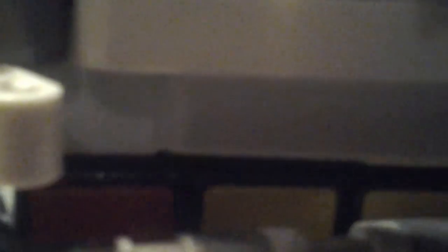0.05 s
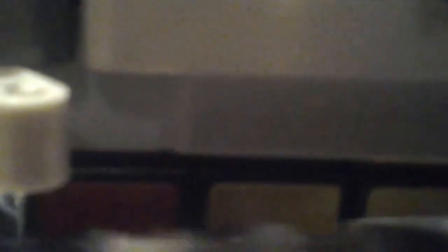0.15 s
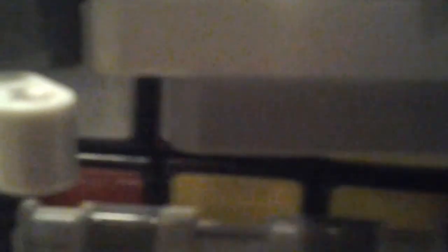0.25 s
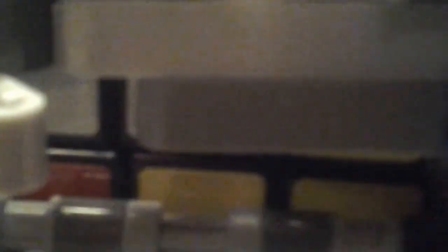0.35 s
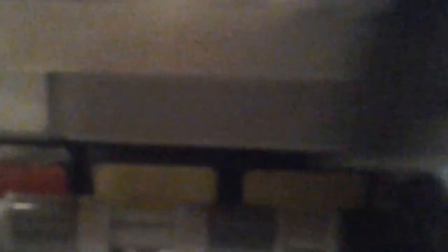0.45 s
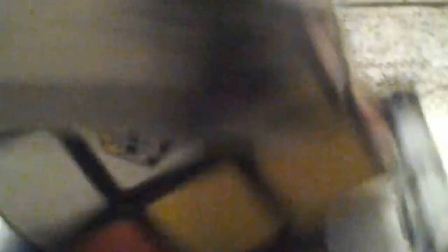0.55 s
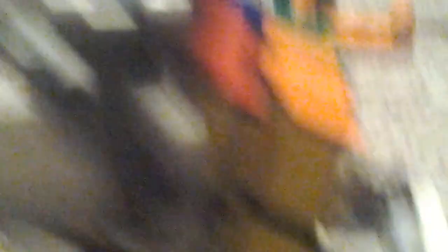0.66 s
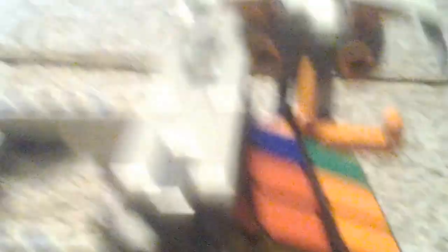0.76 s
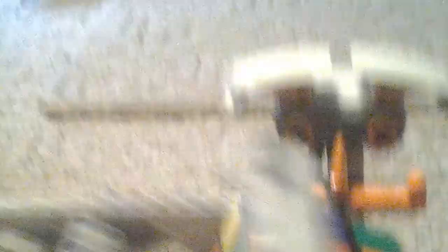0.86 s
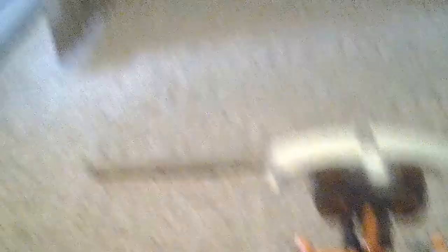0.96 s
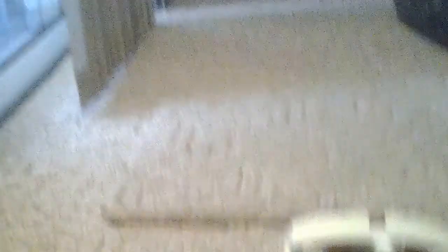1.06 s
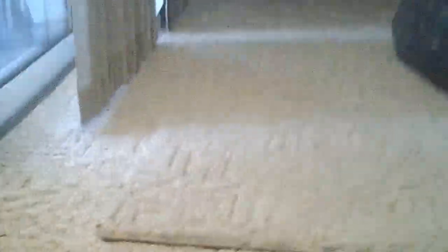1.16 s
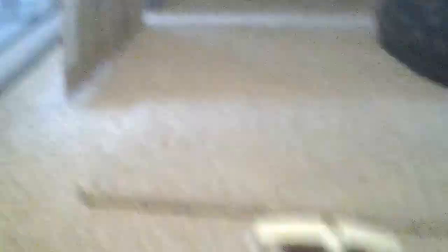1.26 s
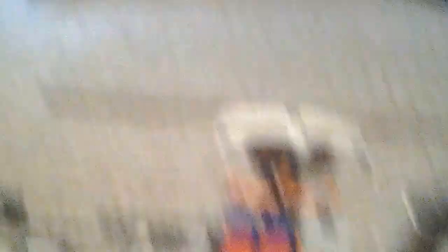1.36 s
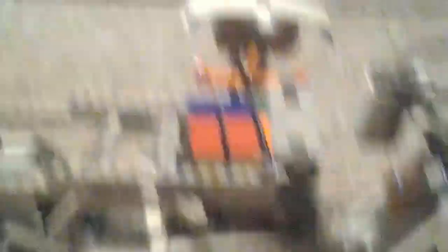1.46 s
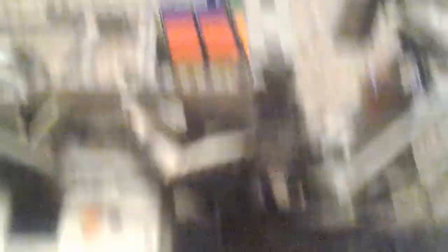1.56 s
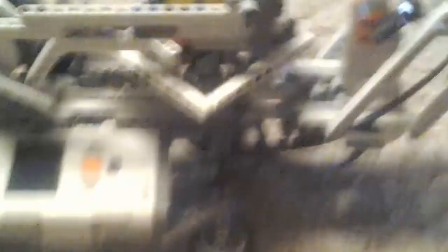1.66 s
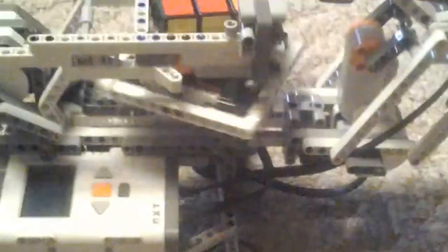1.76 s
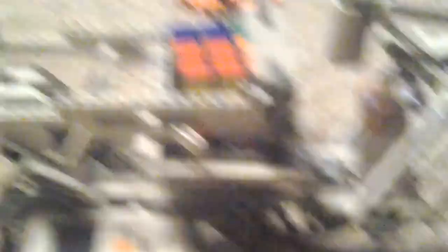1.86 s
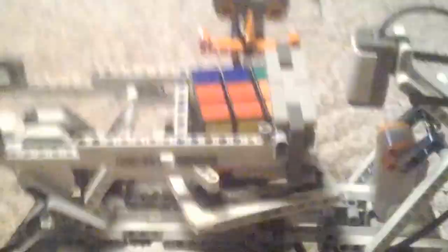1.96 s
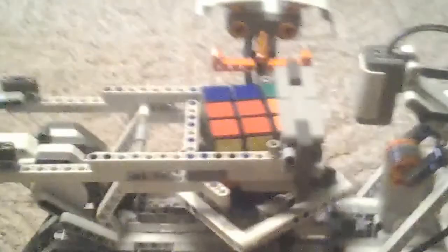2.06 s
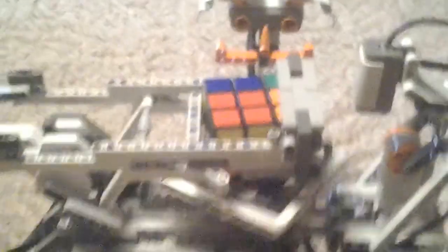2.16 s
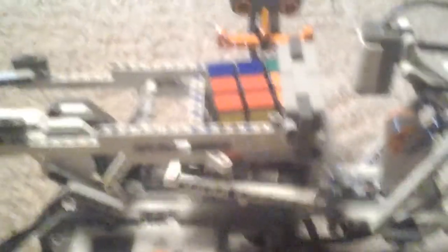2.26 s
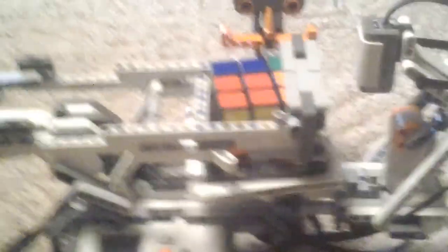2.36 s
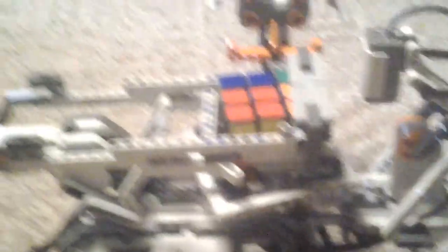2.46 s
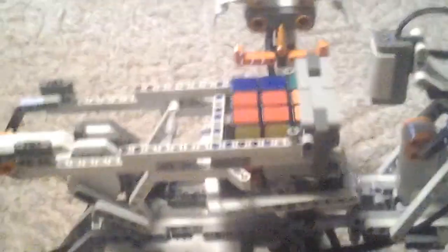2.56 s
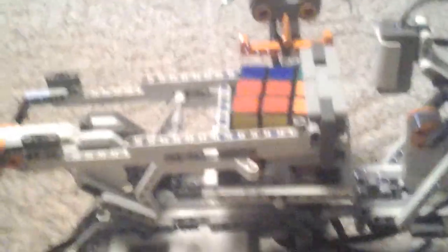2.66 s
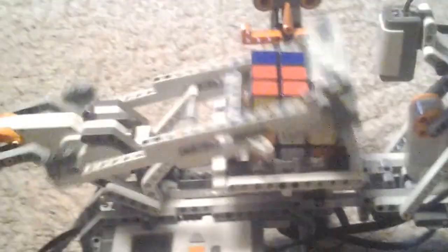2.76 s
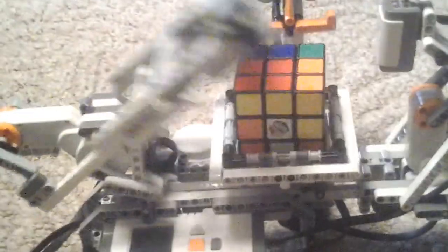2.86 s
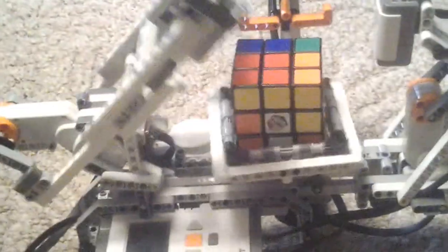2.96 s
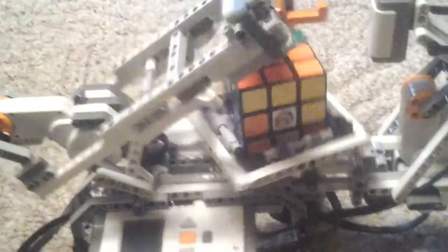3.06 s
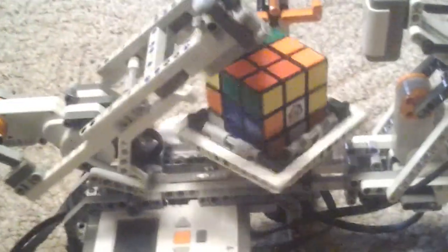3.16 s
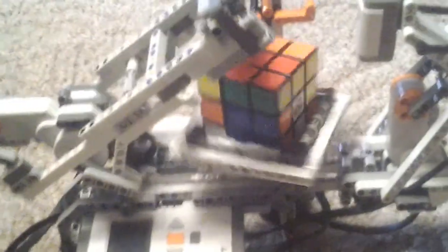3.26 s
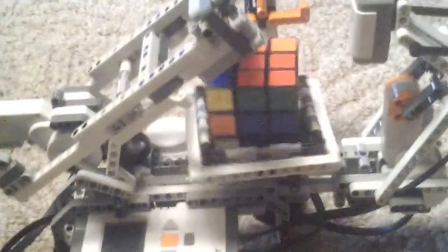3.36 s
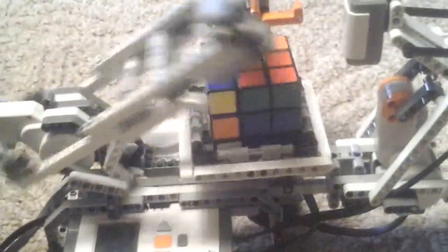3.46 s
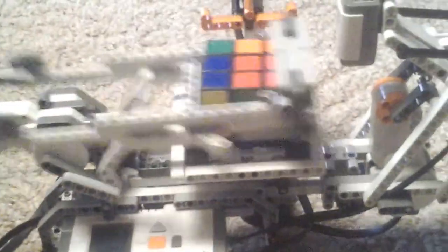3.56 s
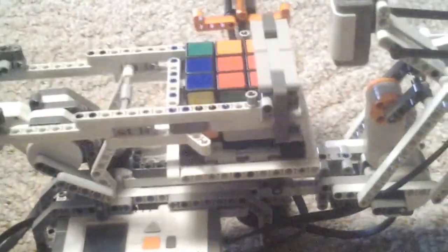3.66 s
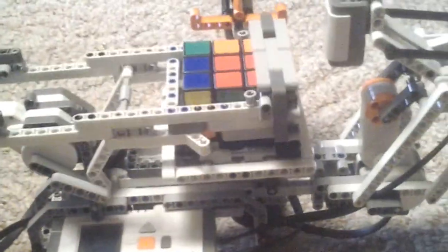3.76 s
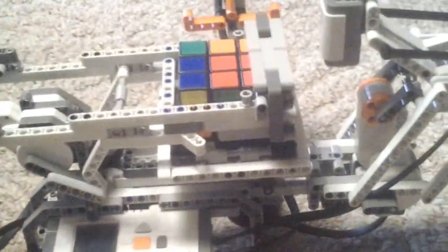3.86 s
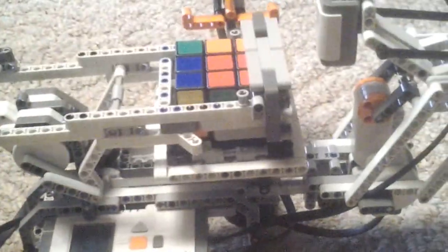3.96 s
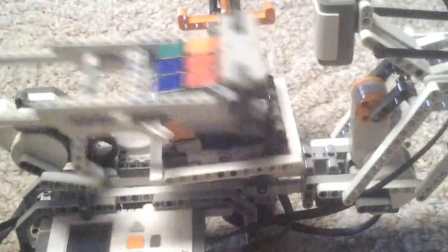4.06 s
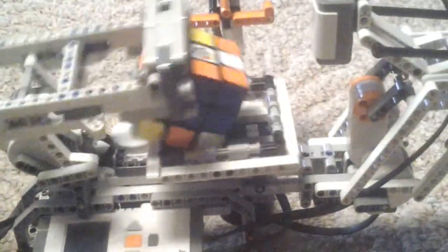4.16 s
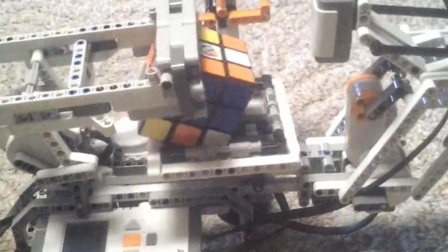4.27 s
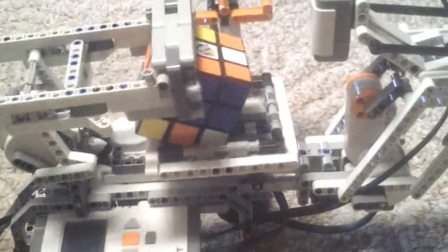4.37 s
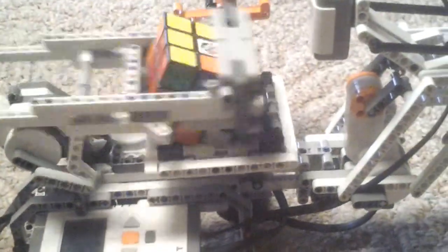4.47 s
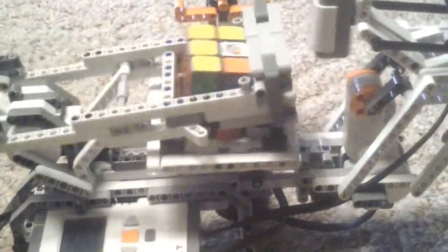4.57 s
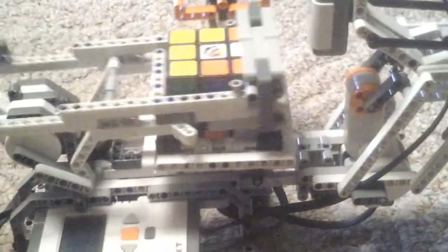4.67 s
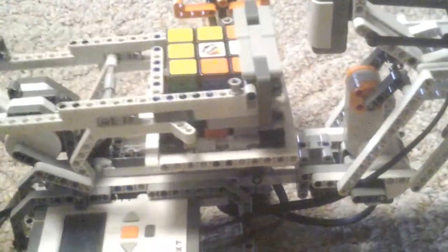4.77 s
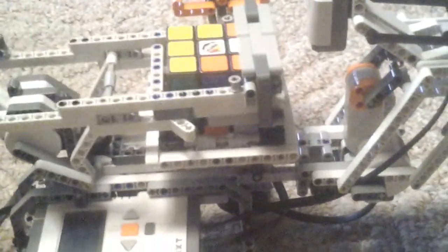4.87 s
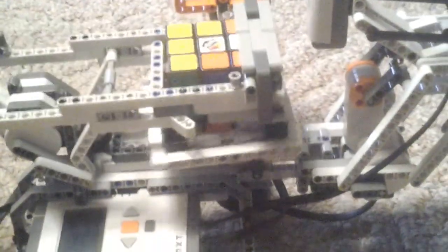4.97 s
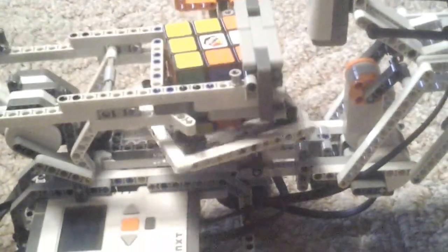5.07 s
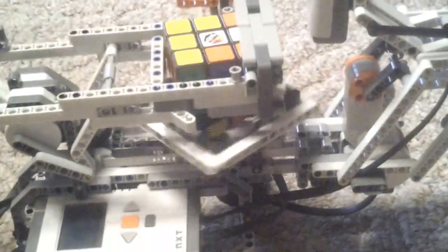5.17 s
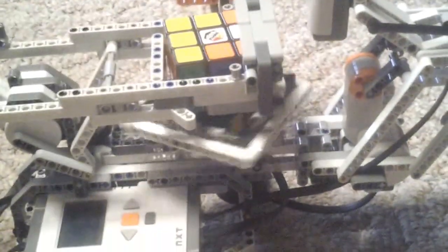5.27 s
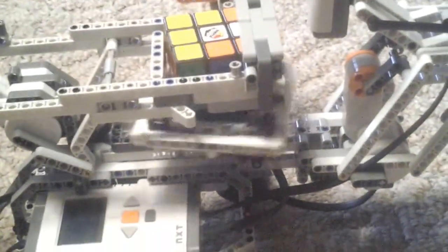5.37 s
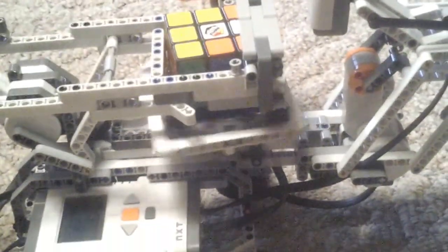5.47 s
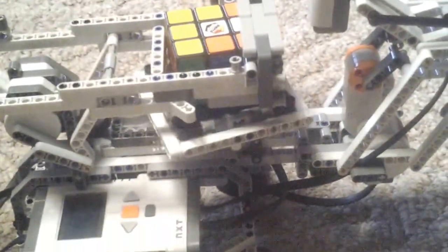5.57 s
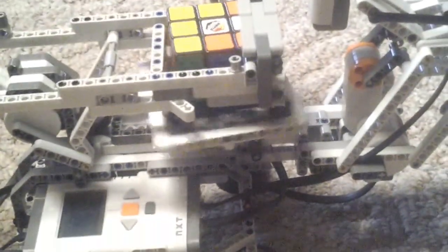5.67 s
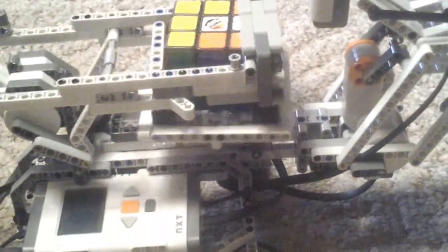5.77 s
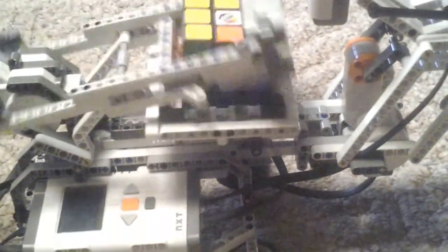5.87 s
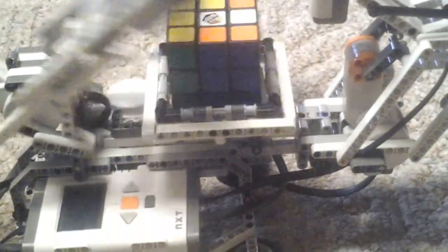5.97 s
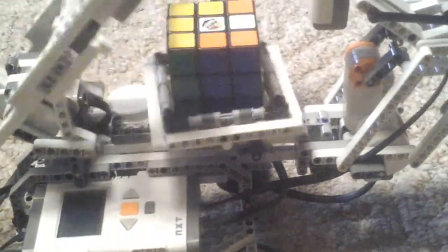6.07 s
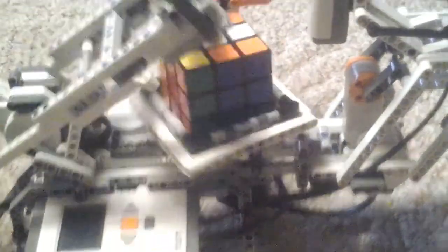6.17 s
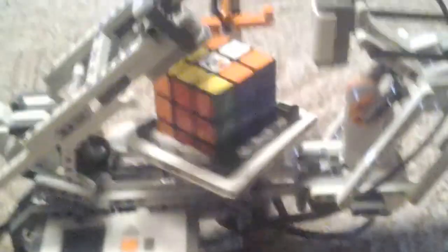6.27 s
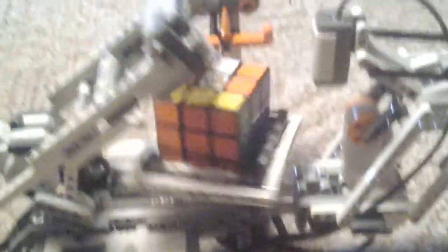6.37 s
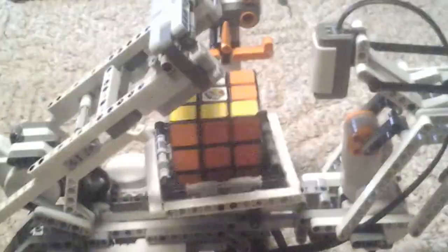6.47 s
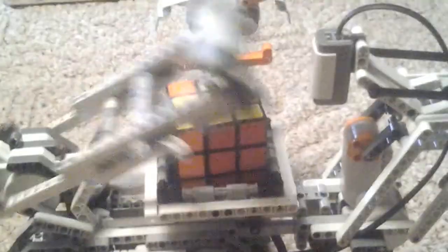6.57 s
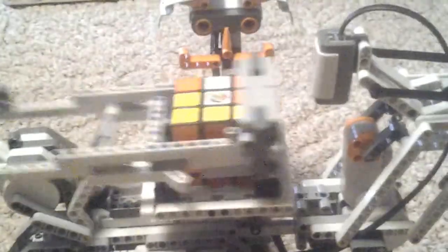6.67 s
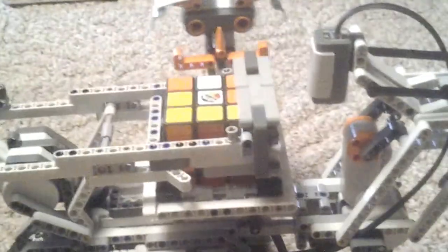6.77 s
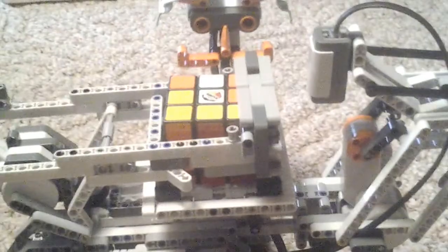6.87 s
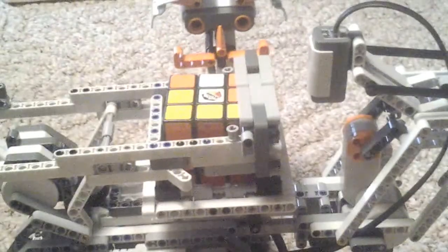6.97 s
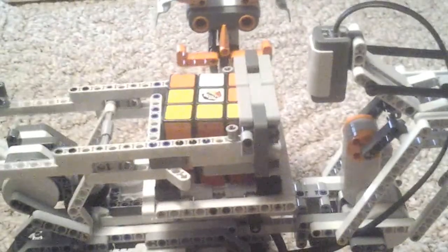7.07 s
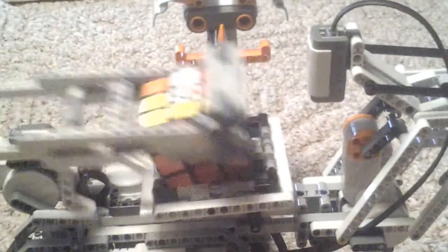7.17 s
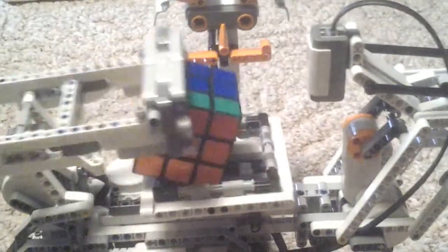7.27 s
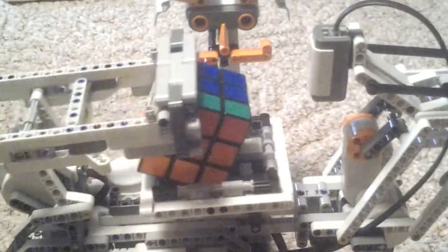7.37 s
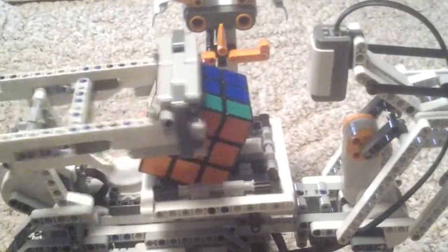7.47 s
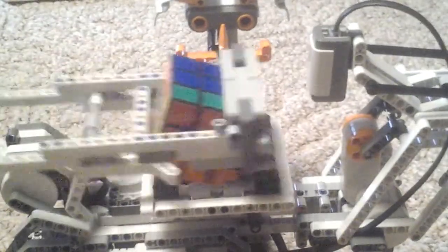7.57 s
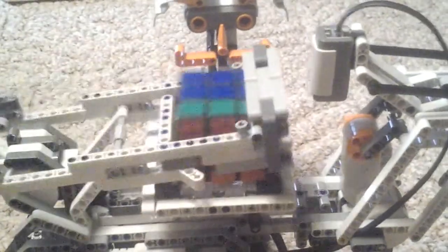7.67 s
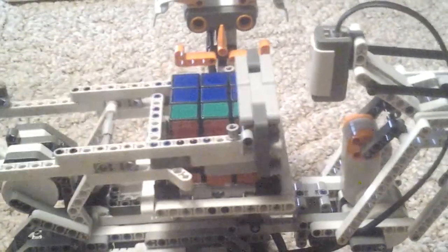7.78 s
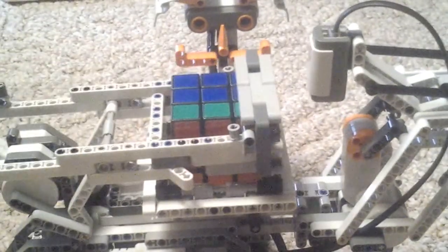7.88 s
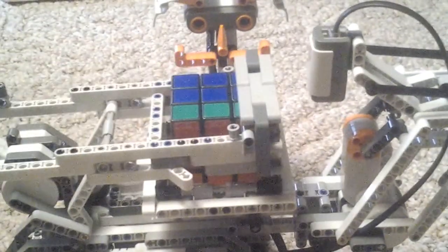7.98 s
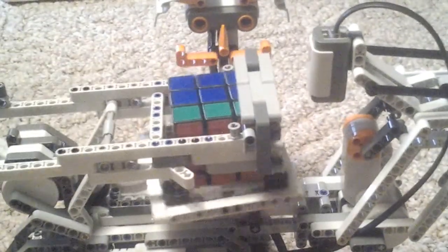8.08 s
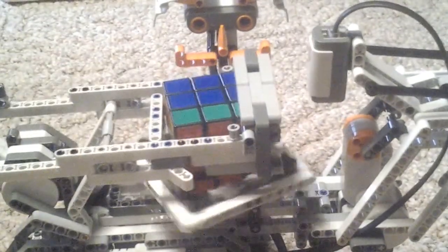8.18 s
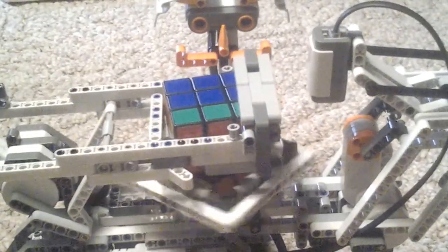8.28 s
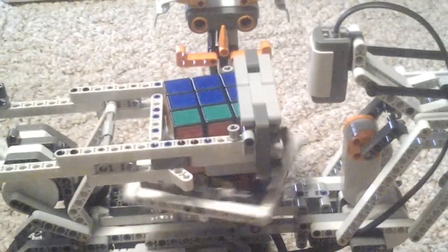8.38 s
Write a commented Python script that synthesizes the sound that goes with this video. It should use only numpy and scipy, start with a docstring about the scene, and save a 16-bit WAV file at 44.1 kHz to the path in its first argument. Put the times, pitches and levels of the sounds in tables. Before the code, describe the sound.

Very close, loud plastic whirs and clacks, then the same small robot slightly farther off, buzzing, pausing and knocking a cube into its tray.

```python
"""In a small carpeted room, a toy robot of plastic beams turns a puzzle cube, heard very close at first.
One geared motor swings an arm that clamps and tips the cube; another spins the tray or twists a layer.
Tooth pulses make the gears whine, and random ticks and rubbing noise make them rattle through the frame.
Short noise bursts make the clacks of the cube, the clicks of pins and soft bumps on the hand-held camera.
A steady hush lies underneath, and both channels are the same."""
import sys
import numpy as np
from scipy import signal
from scipy.fft import rfft, irfft
from scipy.io import wavfile

SR = 44100
rng = np.random.default_rng(int(sys.argv[2]) if len(sys.argv) > 2 else 0)


def output_pcm(signal):
    """Save a mono or channel-first signal as 16-bit PCM at the path in sys.argv[1].

    Samples are clipped to [-1, 1] before scaling.
    """
    pcm = np.clip(np.atleast_2d(signal).T, -1, 1) * 32767
    wavfile.write(sys.argv[1], SR, np.round(pcm).astype(np.int16))


N = 371310
TIME = np.arange(N) / SR

# All levels in the tables are relative: the frame, filters and mix still change them.
# "Balance" sets the low resonance of the frame against the high one; motors() shifts and scales it.

# The tray twists a layer of the cube, one list of rows for each twist.
# Each row: time in seconds, tooth rate in Hz, with some of its wobble; the surge adds more.
TWIST_SPEEDS = [
    [(-0.03, 857.3), (0.04, 818.6)],
    [(1.49, 771.7), (1.856, 793), (1.868, 823.7), (1.95, 839.8), (2.184, 763), (2.318, 848.6),
     (2.38, 837.6), (2.396, 799.5), (2.42, 889)],
    [(5.018, 744), (5.08, 802.4), (5.28, 738.7), (5.418, 773.6), (5.442, 744), (5.464, 777), (5.52, 727)],
    [(8.13, 819), (8.28, 841.5), (8.42, 846.6)],
]
# The load of each twist, whose slow gear catches once a turn.
# Each row: first catch in seconds, level in dB, balance in dB, size of the surge in dB.
TWIST_LOADS = [(0.023, -16.5, -10.5, 2), (1.525, -19, -4, 1.7), (5.061, -18, -4, 2), (8.146, -17.5, -5, 0)]
# How clearly each twist whines over its rattle. Each entry: whine in dB.
TWIST_WHINE_DB = [2, -1, 3, -3]
# The tray motor takes up slack, backs off or spins the unclamped cube, and only rattles.
# Each row: start in seconds, length in seconds, level in dB, balance in dB.
TRAY_RUNS = [(0.084, 0.14, -22, -2.5), (1.374, 0.065, -24.5, -10), (1.425, 0.057, -18.5, -18),
             (2.455, 0.16, -31, 4.5), (2.903, 0.33, -23.5, -3), (3.212, 0.12, -20, -3.5),
             (4.909, 0.33, -23, -4.5), (5.579, 0.14, -28.5, 1), (6.001, 0.43, -23, -4),
             (7.994, 0.15, -24, -5.5)]
# Short rattles of the arm: slow runs under load, and bursts as it rebounds.
# Each row: start in seconds, length in seconds, level in dB, balance in dB.
ARM_RATTLES = [(0.27, .15, -46, -2), (0.645, 0.056, -27.5, 1.5), (0.94, 0.026, -6.5, -12),
               (1.0, 0.024, -10.5, -8), (1.06, 0.057, -17.5, -12.5), (1.17, 0.054, -26.5, -6),
               (1.27, 0.13, -35.5, -14), (4.56, 0.11, -26, -6.5), (7.56, .2, -23, -8)]
# The arm motor spins up, whines while it runs free, then brakes and its rattle fades.
# Each row: start in seconds, seconds from start to end of whine, seconds from start to end of drive,
# top tooth rate in Hz, level in dB, balance in dB, whine over rattle in dB, fade in dB per second.
ARM_STROKES = [(0.42, .172, 0.15, 728, -7.5, -15, 14, 270.5), (0.803, .1, 0.083, 702, -5, -19, 0, 377),
               (2.657, .173, .17, 772.6, -15.5, -6.5, 5.5, 283),
               (3.39, 0.1, 0.16, 713.5, -17.5, -5, 7, 154), (3.977, 0.15, 0.14, 727.7, -17, -5, 5, 141),
               (4.335, 0.08, 0.18, 703, -17.5, -11.5, 15, 253),
               (5.772, .168, .16, 774, -15.5, -9.5, 9.5, 259.5),
               (6.482, 0.099, 0.16, 723, -17, -6, 13.5, 157.5),
               (7.062, 0.16, 0.16, 739, -19.5, -8, 3.5, 160),
               (7.438, 0.096, 0.09, 745, -15.5, -14, 16.5, 152)]
# What the tooth impacts of each motor put into the frame. Each row: frequency in Hz, level in dB.
TRAY_TEETH = [(750, -3.5), (1550, 5.5), (2300, -0.5), (3050, -2.5), (3800, 2), (5300, 3.5), (6100, 0.5),
              (10000, 1.5)]
ARM_TEETH = [(600, -30), (1400, 0), (2100, 2.5), (2900, -3.5), (3600, 0), (4600, 2.5), (6000, -1),
             (10000, 1.5)]
# How the frame radiates from close up, from the tray and from the arm.
# Each row: frequency in Hz, level in dB.
CLOSE_FRAME = [(250, -59), (600, -33.5), (1000, -19.5), (1700, -17.5), (2800, -5.5), (3400, -5.5),
               (4400, 0.5), (5000, -7), (5800, -13), (6700, -12.5), (8000, -19), (11000, -24.5),
               (14000, -50.5)]
TRAY_FRAME = [(400, -53), (820, -20), (1050, -23.5), (1750, -16), (2080, 0), (2480, 1), (2950, -17),
              (3800, -4.5), (4500, -2), (5300, -4.5), (5900, -17), (6600, -8.5), (7500, -18.5),
              (10200, -25), (12500, -69.5)]
ARM_FRAME = [(250, -47), (700, -34.5), (1200, -21.5), (1800, -16), (2300, -2), (3100, -18), (3900, -16),
             (4500, 2.5), (5000, -12), (5800, -14.5), (6600, -11), (7600, -23.5), (10500, -24.5),
             (13000, -54.5)]
# Gears and pins snap across their play. Each row: time in seconds, strength in dB.
PIN_CLICKS = [(0.3295, -23.5), (0.3721, -18), (0.409, -26), (0.609, -8.5), (0.806, -16.5), (0.8411, -9),
              (0.9216, 1), (1.0215, -5.5), (1.0938, -8), (1.2803, -16.5), (3.6921, -31), (3.739, -27),
              (3.8175, -28), (4.259, -16.5), (4.4114, -17), (5.7939, -16), (5.8326, -11), (6.7775, -16.5),
              (7.5029, -4), (7.6125, -6), (7.9958, -32), (8.1427, -5)]
# The hollow cube drops into its tray or is struck by the arm.
# Each row: time in seconds, strength in dB, strength of the hollow body in dB.
CUBE_KNOCKS = [(0.6027, -19, -37), (0.648, 2, -18.5), (0.6905, -18, -34), (0.7373, -15.5, -28.5),
               (0.7607, -18, -33), (0.957, -7, -24.5), (1.6625, -12, -22), (2.7278, -19, -29),
               (3.5269, -5, -21), (3.5573, 5, -16.5), (4.1837, -17, -26), (4.4472, -1, -24),
               (4.4684, -1.5, -21.5), (4.5513, -0.5, -19), (6.6133, -4, -22), (6.6462, 2.5, -25),
               (7.2866, -8, -30.5), (7.327, -15, -30.5), (7.542, -6, -25), (7.574, -1.5, -19),
               (7.651, -8.5, -29), (7.6952, -11, -27)]
# What a knock rings with, and the hollow cube under it. Each row: frequency in Hz, level in dB.
CLACK_RING = [(700, -28.5), (1500, -20), (2300, 4), (3100, -5), (4500, 8), (5600, 2.5), (6600, -9),
              (8500, -12.5), (14000, -41.5)]
CUBE_BODY = [(60, -34), (150, -32.5), (350, 7), (700, -5), (1100, 15), (1600, 18), (3000, -25.5)]
# Soft bumps on the camera. Each row: time in seconds, strength in dB.
BUMPS = [(1.082, -30), (1.186, -38), (1.235, -29), (1.271, -34.5), (1.733, -25), (1.97, -35.5)]
# The dull tone of a bump. Each row: frequency in Hz, level in dB.
BUMP_BODY = [(50, -17), (150, 4.5), (300, 17.5), (550, 14.5), (1200, 9), (3000, -22)]
# The tone of the quiet room. Each row: frequency in Hz, level in dB per Hz.
ROOM_HUSH = [(50, -23), (150, -15.5), (300, -6.5), (520, -2), (900, -14), (2000, -16), (4500, -24),
             (14000, -29.5)]

HUSH_DB = -55  # before the microphone's filters
CLOSE_UNTIL_S = 1.33  # middle of the fade from close up to farther away
TOP_HZ = 15300  # edge of the treble cut
# time constants in seconds with which a stroke, a run that only rattles and a twist come up
SPIN_UP_S, RATTLE_RISE_S, TWIST_RISE_S = 0.035, 0.018, 0.0036
STOP_DB_PER_S = 300.5  # how fast a run that only rattles or a twist dies away
WHINE_AFTER_S = 0.043  # an arm stroke starts to whine this long after its start
BREAKAWAY_DB, EASE_S = 5, 0.27  # a layer is stiffest as it breaks away, then eases


def undb(db):
    """Turn decibels into gain."""
    return 10 ** (np.asarray(db) / 20)


def unit(x):
    """Scale to an average strength (rms) of 1."""
    return x / np.sqrt(np.mean(x ** 2))


def colour(x, points):
    """Give x the tone drawn by (Hz, dB) points, without pre-echo; white noise keeps its power."""
    hz, db = np.transpose(points)
    size = 2048
    bin_hz = np.fft.rfftfreq(size, 1 / SR)
    log_gain = np.log(undb(np.interp(np.log(bin_hz + 1), np.log(hz), db)))
    # folding the cepstrum forward makes the filter respond only after its input
    cepstrum = irfft(log_gain)[:size // 2]
    cepstrum[1:] *= 2
    response = irfft(np.exp(rfft(cepstrum, size)))
    return signal.oaconvolve(x, response / np.linalg.norm(response))[:len(x)]


def hush():
    """The quiet room: steady noise with the room's tone."""
    return undb(HUSH_DB) * colour(rng.standard_normal(N), ROOM_HUSH)


def walk(rate):
    """Wander smoothly at random, with about rate turns a second and spread 1."""
    steps = rng.standard_normal(N // 8)
    return unit(np.interp(TIME * rate, np.arange(len(steps)), steps))


def gate(spans, fade_s):
    """1 inside the (from, to) spans, sloping to 0 across their edges."""
    return sum(np.clip(0.5 + np.minimum(TIME - a, b - TIME) / fade_s, 0, 1) for a, b in spans)


def running(spans, gains_db, fade_s):
    """The gain of each run while it lasts, 0 between runs."""
    return sum(undb(db) * gate([span], fade_s) for span, db in zip(spans, gains_db))


def effort(start_s, length_s, rise_s, fade_db_per_s):
    """Gain of one run: it grows with the square of the motor's speed and fades once the drive is cut."""
    age = np.maximum(TIME - start_s, 0)
    speed = 1 - np.exp(-age / rise_s)
    fade_db = -abs(fade_db_per_s) * np.maximum(age - length_s, 0)
    return speed ** 2 * undb(fade_db)


def twist_spans():
    """From when to when each twist lasts."""
    return [(run[0][0], run[-1][0]) for run in TWIST_SPEEDS]


def twist_speed():
    """Tooth rate of the tray motor in Hz, joined by straight lines."""
    return np.interp(TIME, *np.concatenate(TWIST_SPEEDS).T)


def surge():
    """Every forty teeth the loaded tray jerks free and then slows: a rounded sawtooth."""
    turns = np.cumsum(twist_speed()) / SR / 40
    wave, depth_db = np.zeros((2, N))
    for span, (catch_s, _, _, surge_db) in zip(twist_spans(), TWIST_LOADS):
        angle = 2 * np.pi * (turns - np.interp(catch_s, TIME, turns)) + np.pi / 3
        jerk = gate([span], fade_s=0.04) * (np.sin(angle) + 0.35 * np.sin(2 * angle))
        wave = wave + jerk
        depth_db = depth_db + surge_db * jerk
    return wave, depth_db


def arm_speed():
    """Tooth rate of the arm motor in Hz: at every stroke it starts from 0 and nears its top speed."""
    hz = np.full(N, 500.0)
    for start, _, _, top_hz, *_ in ARM_STROKES:
        on = TIME > start
        hz[on] = top_hz * (1 - np.exp((start - TIME[on]) / SPIN_UP_S))
    return hz


def stutter(rate, decay_s, depth_db):
    """The long, loose arm judders: at random moments its gears snatch, and the jolt dies away. In dB."""
    snatches = (rng.random(N) < rate / SR) * rng.random(N)
    jolts = np.tanh(signal.oaconvolve(snatches, np.exp(-TIME[:SR // 10] / decay_s))[:N])
    return depth_db * (jolts - jolts.mean())


def mesh(hz, wander, scatter_db, shaft_db, stage_db):
    """A pulse for each tooth; the ten-tooth pinion and the next gear stage make the pulses uneven."""
    hz = hz * (1 + wander * walk(250))
    teeth = np.cumsum(hz) / SR
    at = np.flatnonzero(np.diff(np.floor(teeth)))[:-1]
    late = (np.ceil(teeth[at]) - teeth[at]) * SR / hz[at]
    turn = 2 * np.pi * teeth[at]
    next_stage = turn * 9 / 40  # nine beats for every forty teeth
    size_db = scatter_db * rng.standard_normal(N)[at]
    size_db = size_db + shaft_db * np.sin(turn / 10) + stage_db * np.sin(next_stage)
    size = undb(size_db)
    # share each pulse between two samples, so that it can fall between them
    pulses = np.zeros(N)
    pulses[at], pulses[at + 1] = size * (1 - late), size * late
    # slow pushes do not radiate from so small a frame
    return unit(signal.sosfilt(signal.butter(2, 650, "high", fs=SR, output="sos"), pulses))


def disperse(x, delay_s):
    """Bending waves run faster in the treble, so a pulse spreads along a beam; the delay is for 3 kHz."""
    hz = np.fft.rfftfreq(N, 1 / SR)
    return irfft(rfft(x) * np.exp(-4j * np.pi * delay_s * np.sqrt(3000 * hz)), N)


def ring(x, t60_s, wet_db):
    """Add a dense, decaying tail: the many modes of the beams, or the room."""
    t = TIME[:SR // 2]
    tail = rng.standard_normal(len(t)) * undb(-60 * t / t60_s)
    return x + undb(wet_db) * signal.oaconvolve(x, tail / np.linalg.norm(tail))[:N]


def rattle(rate, spread_db, ring_s, rub):
    """Loose gears and pins chatter: dense, uneven ticks, each briefly ringing, over rubbing plastic."""
    tick_size = undb(spread_db * np.clip(rng.standard_normal(N), -2, 2))
    ticks = (rng.random(N) < rate / SR) * rng.choice([-1, 1], N) * tick_size
    t = TIME[:SR // 20]
    energy = signal.oaconvolve(ticks ** 2, undb(-120 * t / ring_s))[:N]
    ringing = np.sqrt(np.abs(energy)) * rng.standard_normal(N)
    return unit(0.38 * unit(ticks) + unit(ringing) + rub * rng.standard_normal(N))


def gears():
    """Arm strokes and twists whine over their rattle; all other runs only rattle."""
    jerk, surge_db = surge()
    tray_hz = twist_speed() * (1 + 0.017 * jerk)
    tray = mesh(tray_hz, wander=0.012, scatter_db=3, shaft_db=3, stage_db=2.5)
    arm = mesh(arm_speed(), wander=0.006, scatter_db=2, shaft_db=1.8, stage_db=3)
    # gliding partials swell and fade as they cross the narrow modes of the beams
    tray = unit(ring(disperse(colour(tray, TRAY_TEETH), delay_s=0.005), t60_s=0.03, wet_db=-6))
    arm = unit(ring(disperse(colour(arm, ARM_TEETH), delay_s=0.006), t60_s=0.035, wet_db=-1))
    free = [(start + WHINE_AFTER_S, start + free_s) for start, free_s, *_ in ARM_STROKES]
    tray_whine = running(twist_spans(), TWIST_WHINE_DB, fade_s=0.054)
    arm_whine = running(free, [whine_db for *_, whine_db, _ in ARM_STROKES], fade_s=0.0073)
    chatter = rattle(rate=650, spread_db=5.0, ring_s=0.052, rub=0.43)
    force = chatter + arm_whine * arm + tray_whine * tray
    # keep the power level as the whine comes and goes
    force = force / np.sqrt(1 + arm_whine ** 2 + tray_whine ** 2)
    return force * undb(surge_db)


def rattling_runs(runs):
    """Gain and balance of each run that only rattles."""
    return [(undb(db) * effort(start, length, RATTLE_RISE_S, STOP_DB_PER_S), balance_db)
            for start, length, db, balance_db in runs]


def drive():
    """All runs together: their gain, their balance in dB, and the tray motor's share of the power."""
    tray = rattling_runs(TRAY_RUNS)
    for (start, end), (_, db, balance_db, _) in zip(twist_spans(), TWIST_LOADS):
        stiff_db = BREAKAWAY_DB * np.exp(-np.maximum(TIME - start, 0) / EASE_S)
        gain = undb(db + stiff_db) * effort(start, end - start, TWIST_RISE_S, STOP_DB_PER_S)
        tray.append((gain, balance_db))
    arm = rattling_runs(ARM_RATTLES)
    for start, _, driven, _, db, balance_db, _, fade in ARM_STROKES:
        arm.append((undb(db) * effort(start, driven, SPIN_UP_S, fade), balance_db))
    runs = arm + tray
    power = sum(gain ** 2 for gain, _ in runs) + 1e-18
    balance = sum(gain ** 2 * balance_db for gain, balance_db in runs) / power
    on_tray = sum(gain ** 2 for gain, _ in tray) / power
    return np.sqrt(power), balance, on_tray


def resonance(x, low_hz, high_hz):
    """The part of x that one broad resonance of the frame carries."""
    return signal.sosfiltfilt(signal.butter(1, [low_hz, high_hz], "band", fs=SR, output="sos"), x)


def motors(close_db, arm_db, tray_db):
    """The gear forces shake the frame, which sounds different from each motor and from close up."""
    gain, balance_db, on_tray = drive()
    judder_db = (1 - on_tray) * stutter(rate=47, decay_s=0.0079, depth_db=9.5)
    force = gears() * gain * undb(judder_db)
    close = gate([(-1, CLOSE_UNTIL_S)], fade_s=0.27)
    # the load shifts weight between the low and high resonance, around a balance set by where one listens
    lean_db = balance_db + 3.5 + 6 * close
    force = force + (undb(0.73 * lean_db) - 1) * resonance(force, 1800, 2900)
    force = force + (undb(-0.25 * lean_db) - 1) * resonance(force, 4400, 5640)
    arm = undb(arm_db) * colour(force * (1 - on_tray), ARM_FRAME)
    tray = undb(tray_db) * colour(force * on_tray, TRAY_FRAME)
    near = undb(close_db) * colour(force, CLOSE_FRAME)
    return close * near + (1 - close) * (arm + tray)


def clacks(crack_s, tail_db, tail_s, ring_db, body_db):
    """Each knock is a sharp crack and a short clatter; knocks of the cube also sound its hollow body."""
    t = TIME[:SR // 5]
    shell, body = np.zeros((2, N + SR))
    pins = [(s, db, -np.inf) for s, db in PIN_CLICKS]  # no hollow body
    for s, strength_db, hollow_db in [*CUBE_KNOCKS, *pins]:
        fall = undb(-60 * t / crack_s) + undb(tail_db - 60 * t / tail_s)
        blow = rng.standard_normal(len(t)) * fall
        i = int(s * SR)
        shell[i:i + len(t)] += blow * undb(strength_db)
        body[i:i + len(t)] += blow * undb(hollow_db)
    return undb(ring_db) * colour(shell[:N], CLACK_RING) + undb(body_db) * colour(body[:N], CUBE_BODY)


def bumps(rise_s, gain_db):
    """Dull knocks of the hand on the camera: noise that swells quickly and dies away."""
    push = np.zeros(N)
    for s, db in BUMPS:
        age = np.maximum(TIME - s, 0) / rise_s
        push += undb(db + gain_db) * age * np.exp(1 - age)
    return colour(push * rng.standard_normal(N), BUMP_BODY)


def scene():
    """The robot in a small carpeted room over a steady hush, the same in both ears."""
    robot = motors(close_db=-1.64, arm_db=0.7, tray_db=-1.46)
    robot = robot + clacks(crack_s=0.018, tail_db=-17, tail_s=0.22, ring_db=-3, body_db=1)
    in_room = ring(robot, t60_s=0.35, wet_db=-17.5)
    mono = in_room + bumps(rise_s=0.0083, gain_db=-4.5) + hush()
    return np.array([mono, mono])


def record(dry):
    """The loudest knocks overload the microphone; the deep bass and the top are cut."""
    clipped = np.clip(dry, -1, 1)
    thin = signal.sosfilt(signal.butter(1, 140, "high", fs=SR, output="sos"), clipped)
    return signal.sosfilt(signal.ellip(8, 0.2, 70, TOP_HZ, fs=SR, output="sos"), thin)


dry = scene()
out = record(dry)
output_pcm(out)
```